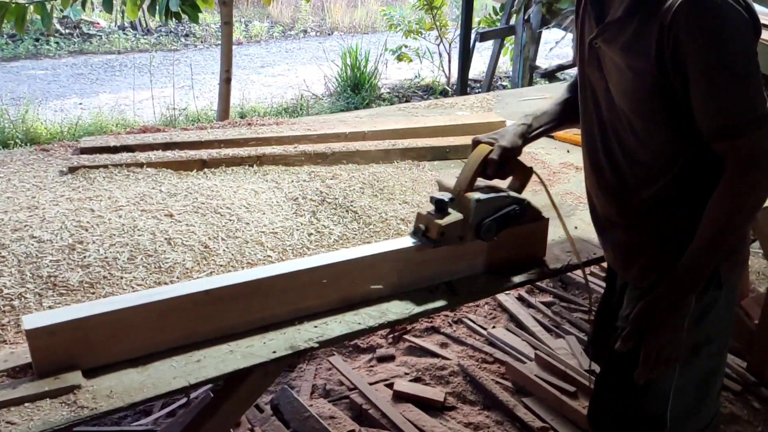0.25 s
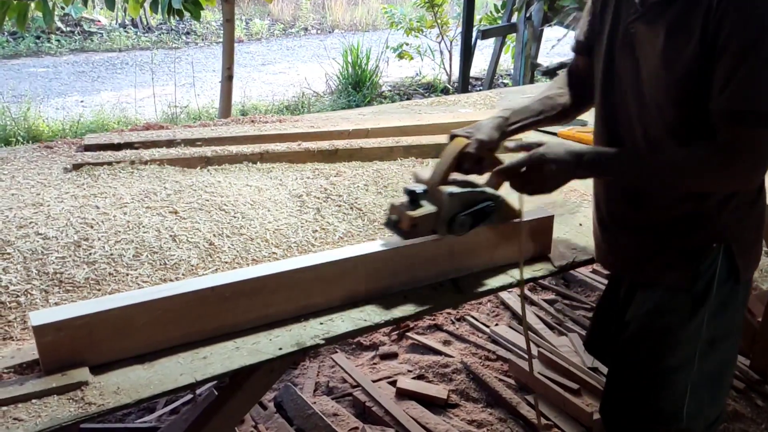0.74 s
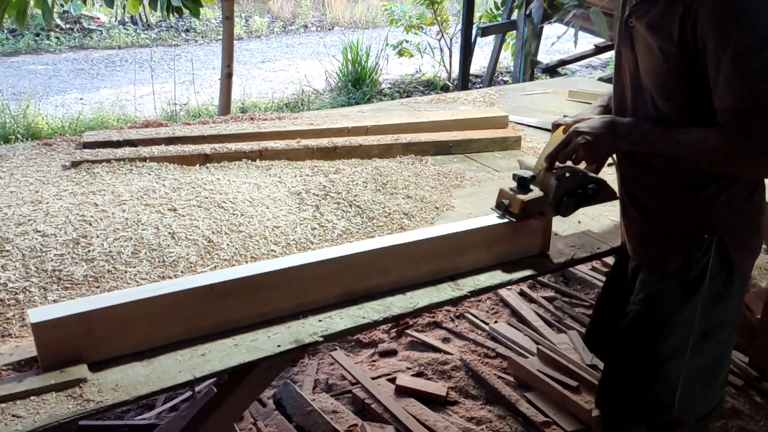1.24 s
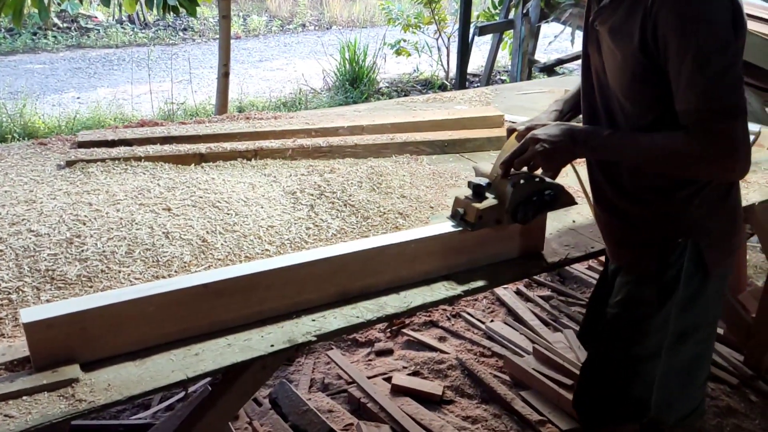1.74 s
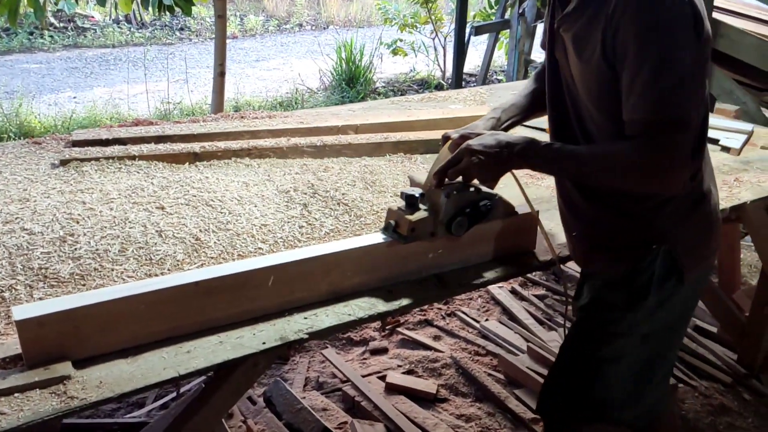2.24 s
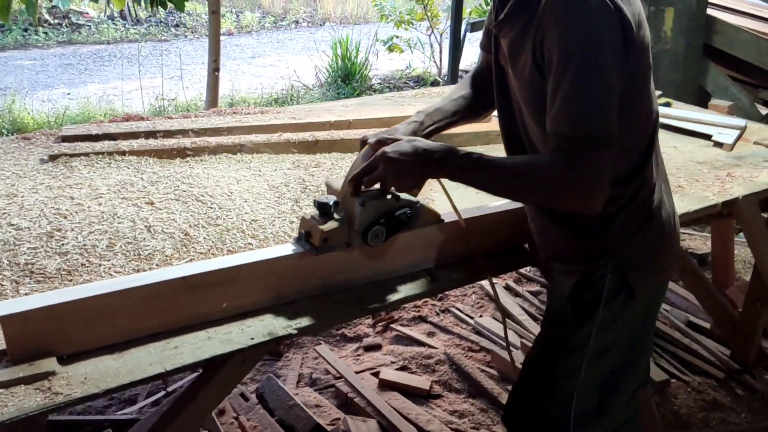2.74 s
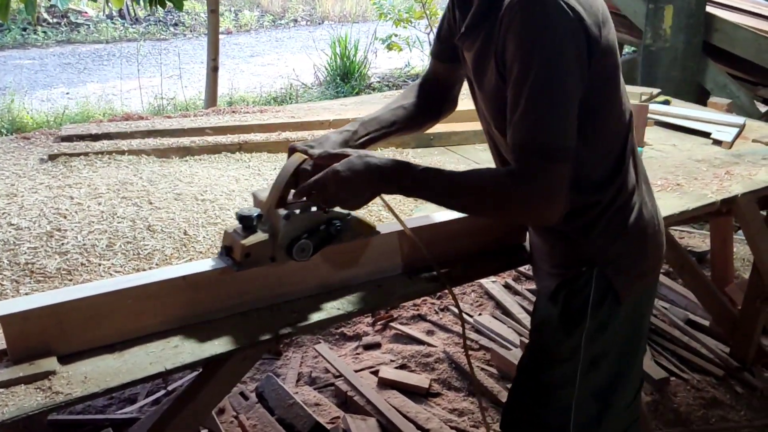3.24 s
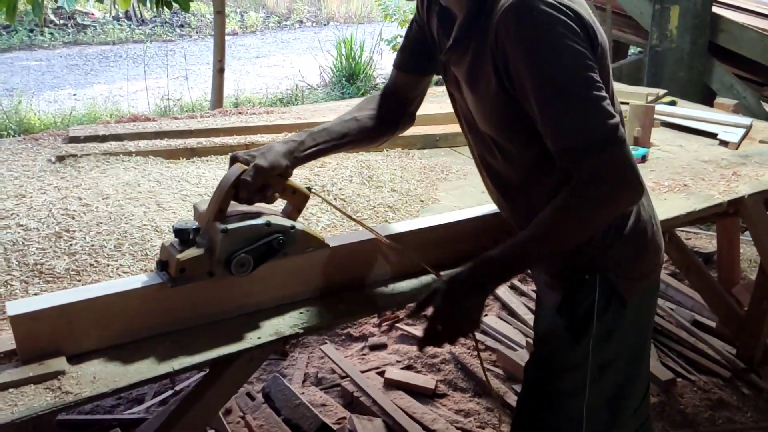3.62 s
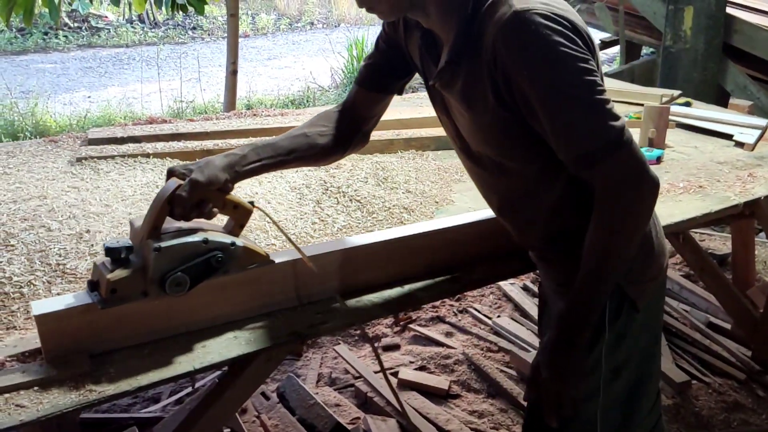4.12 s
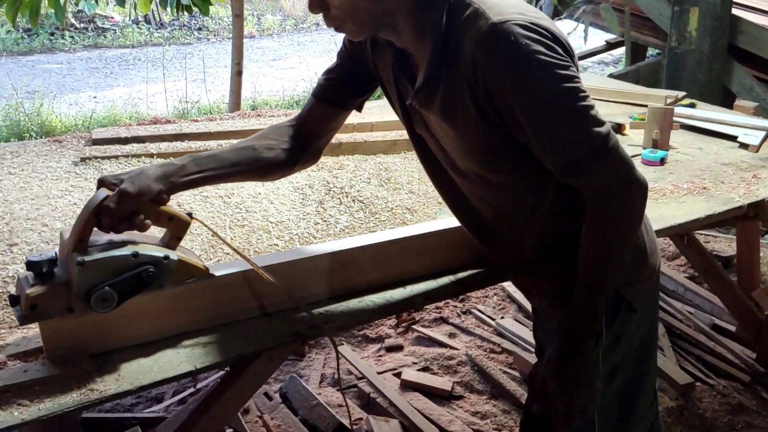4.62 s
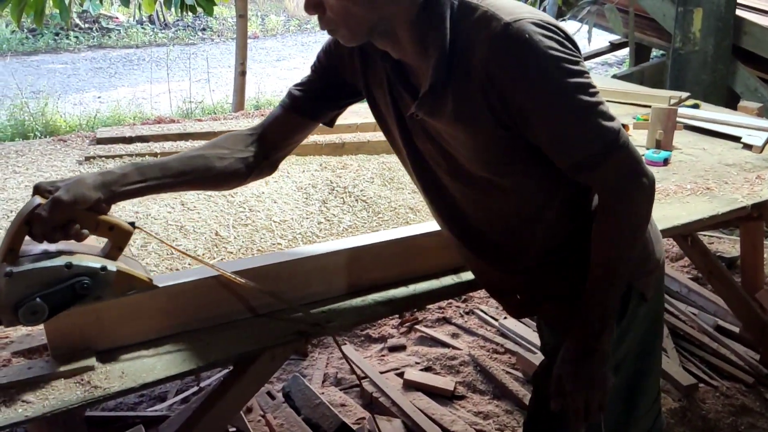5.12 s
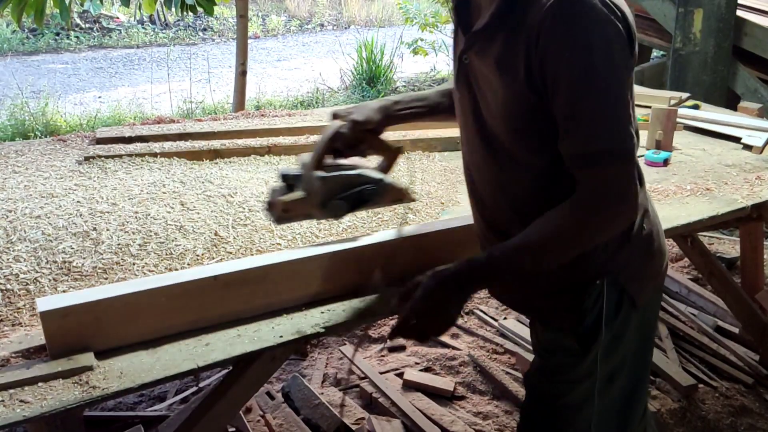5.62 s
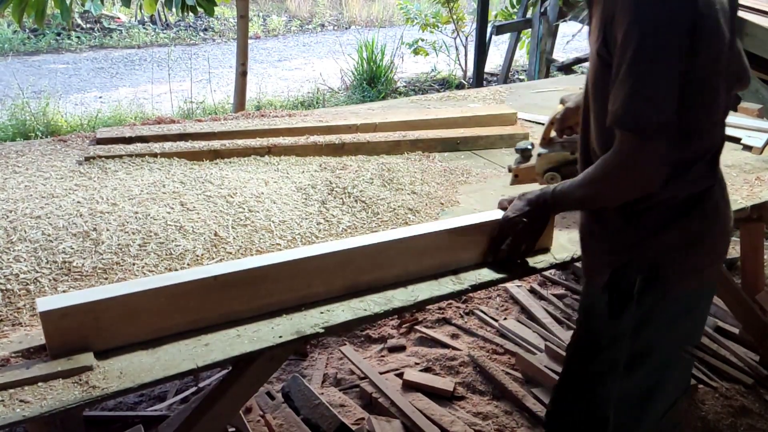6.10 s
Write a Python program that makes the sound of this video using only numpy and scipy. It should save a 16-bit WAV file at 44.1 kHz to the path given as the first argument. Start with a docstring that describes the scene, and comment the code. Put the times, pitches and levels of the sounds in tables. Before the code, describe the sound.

Close stereo capture of an electric planer on timber. The end of a short pass buzzes loudly, then the freed cutter hums and whines higher. A long second pass follows, rough, bright and strained, with shifting woody resonances and a spray of chips. It then clears the beam, surges in speed, and winds down with airy hum, fan hiss and faint low rumble in an open shed.

```python
"""The buzz of planer blades in a beam comes first, in an open shed: a short pass, then a long one, then lift and coast.
Two blades strike the wood per turn of the cutter: harmonics of its speed, which sags with the load.
Running free, the drum hums and the motor whines, as wavering partials geared to the same speed.
The fan hisses throughout as coloured noise, muffled while the sole is down; chips hiss in the cut."""
import sys
import numpy as np
from scipy import signal
from scipy.fft import rfft, irfft
from scipy.io import wavfile
from scipy.ndimage import map_coordinates

SR = 44100
rng = np.random.default_rng(int(sys.argv[2]) if len(sys.argv) > 2 else 0)


def bounce(signal):
    """Save signal as a 16-bit WAV file at the path given by the first command-line argument."""
    frames = np.transpose(np.atleast_2d(signal))
    limited = np.clip(frames, -1, 1)
    pcm = np.round(limited * 32767).astype(np.int16)
    wavfile.write(sys.argv[1], SR, pcm)


N = 280476
TIME = np.arange(N) / SR
BINS = np.fft.rfftfreq(N, 1 / SR)  # Hz
FRAMES = np.arange(0, N + 63, 64) / SR  # s, control times of the blade harmonics


def gain_of(db):
    """Amplitude factor of a level in dB."""
    return 10 ** (np.asarray(db) / 20)


def evened(x):
    """Scales to rms 1."""
    return x / np.sqrt(np.mean(abs(x) ** 2) + 1e-20)


def read(points, hz):
    """A spectrum, joined on a log-frequency axis."""
    point_hz, value = np.transpose(points)
    return np.interp(np.log(hz + 1), np.log(point_hz + 1), value)


def curves(rows):
    """Each column of a table at every sample."""
    time_s, *columns = np.transpose(rows)
    return [np.interp(TIME, time_s, column) for column in columns]


def wander(rate_hz):
    """Slow chance of rms 1."""
    spectrum = rfft(rng.standard_normal(N // 32))
    slow = irfft(spectrum / (1 + (BINS[:len(spectrum)] / rate_hz) ** 4))
    return evened(np.interp(TIME, np.linspace(0, TIME[-1], len(slow)), slow))


def flutter(count, rate_hz):
    """Complex chance of rms 1 at the frame times, one row per harmonic."""
    shape = (count, len(FRAMES))
    z = rng.standard_normal(shape) + 1j * rng.standard_normal(shape)
    frame_bins_hz = np.fft.fftfreq(len(FRAMES), FRAMES[1])
    return evened(np.fft.ifft(z / (1 + (frame_bins_hz / rate_hz) ** 2)))


def resonances(rows, hz):
    """Gain in dB of bell-shaped peaks and notches."""
    return sum(db * np.exp(-((hz - centre_hz) / width_hz) ** 2) for centre_hz, width_hz, db in rows)


def tone(turns, multiple, waver_rad, rate_hz):
    """One wavering partial of rms 1, reaching the microphones with its own phase."""
    phase = 2 * np.pi * (multiple * turns + rng.random()) + waver_rad * wander(rate_hz)
    apart_rad = np.minimum(multiple / 20, 2) * rng.uniform(-1, 1)
    return np.sqrt(2) * np.cos([phase + apart_rad / 2, phase - apart_rad / 2])


# likeness of the two microphones: freq_hz, likeness_0_to_1
MIC_LIKENESS = [(60, .85), (400, .9), (1000, .68), (4000, .55), (7000, .4), (9000, .3), (14000, .15)]


def air_noise(colour):
    """Coloured noise of rms 1, partly alike at the two microphones."""
    a, b = rfft(rng.standard_normal((2, N)))
    same = read(MIC_LIKENESS, BINS)
    pair = np.array([a, same * a + np.sqrt(1 - same ** 2) * b])
    return evened(irfft(pair * gain_of(read(colour, BINS)), N))


# drum under power, sagging with the load: time_s, speed_turns_per_s
DRUM_SPEED = [(0.0, 229.8), (0.24, 232.8), (0.47, 231.7), (0.556, 221.6), (0.645, 218.2), (0.87, 248.0),
              (1.11, 266.2), (1.31, 277.0), (1.43, 270.7), (1.83, 240.4), (2.12, 230.3), (2.42, 209.2),
              (2.56, 217.3), (2.7, 221.0), (2.9, 211.8), (3.1, 205.5), (3.36, 206.9), (3.82, 215.3),
              (4.15, 210.8), (4.53, 210.6), (4.8, 213.8), (4.93, 218.2), (5.33, 259.1)]
OFF_S, OFF_HZ, COAST_S = 5.36, 258.6, 2.68  # switch-off time, speed then, time constant
USUAL_HZ = 230


def drum_speed():
    """Turns per second: driven, then coasting down exponentially."""
    coasting_hz = OFF_HZ * np.exp((OFF_S - TIME) / COAST_S)
    return np.where(TIME < OFF_S, curves(DRUM_SPEED)[0], coasting_hz)


def doublings():
    """The speed in octaves above the usual one."""
    return np.log2(drum_speed() / USUAL_HZ)


def held(start_s, end_s, attack_s, release_s):
    """Attack, hold and release from 0 to 1, halfway at start and end."""
    rise = (TIME - start_s) / attack_s
    fall = (end_s - TIME) / release_s
    return np.clip(.5 + np.minimum(rise, fall), 0, 1)


# passes along the beam: sole_over_s, blades_bite_s, blades_run_out_s, tool_lifts_s, sole_clear_s, lift_length_s
PASSES = [(-0.4, -0.2, 0.673, 0.74, 0.836, 0.04), (1.133, 1.304, 5.15, 5.228, 5.46, 0.012)]
NEAR_S, BITE_S, RUN_OUT_S = 0.094, 0.025, 0.031  # length of each change


def bite():
    """0 with the blades running free, 1 with them in the wood."""
    return sum(held(start, end, BITE_S, RUN_OUT_S) for _, start, end, *_ in PASSES)


def stance(ease_s=0):
    """Shares that sum to 1: sole on the wood, hovering just above it, in free air."""
    down = sum(held(start, lift, BITE_S, lift_s + ease_s) for _, start, _, lift, _, lift_s in PASSES)
    over_beam = sum(held(over, clear, NEAR_S, NEAR_S) for over, *_, clear, _ in PASSES)
    near = np.maximum(down, over_beam)
    return down, near - down, 1 - near


# planer before the microphones: time_s, left_delay_ms
LEFT_DELAY = [(0, -0.079), (3, -0.085), (3.8, 0.13), (4.55, 0.24), (5.45, 0.23), (5.85, -0.046),
              (6.3, -0.093)]


def travel(pair):
    """As the planer moves along the beam, its sound reaches one microphone before the other."""
    lag_samples = curves(LEFT_DELAY)[0] * SR / 1000
    left = map_coordinates(pair[0], [np.arange(N) - lag_samples], order=5, mode="mirror")
    return np.array([left, pair[1]])


def reach(steepness=27.0):
    """0 with the planer at the near end of the beam, rising to 1 as its nose overhangs the far end."""
    lag_ms = curves(LEFT_DELAY)[0]
    return ((lag_ms - lag_ms.min()) / np.ptp(lag_ms)) ** steepness


# way along the beam: time_s, place_0_near_to_1_far
BEAM_PLACE = [(0, .07), (.65, .33), (1, 0), (1.3, 0), (2, .16), (3, .44), (4, .74), (5.2, 1)]
# pitches the beam and bench favour or swallow, before depth: centre_hz, width_hz, gain_db, place_0_to_1,
# spread_beam_lengths
BEAM_RESONANCES = [(1496, 130, -11, 1, 0.041), (1840, 70, -6.5, 0.3, 2), (2175, 51, -17, 0.07, 0.33),
                   (2390, 153, -10.5, 0.64, 0.58), (2510, 106, 8.5, 0.1, 2), (2770, 110, -21, 0.89, 0.11),
                   (2726, 120, -21, 0.34, 0.32), (3000, 95, 1.5, 0.74, 0.16), (3100, 42, 6.5, 0.2, 0.092),
                   (3184, 76, -12, 0.7, 2.2), (3480, 92, 7, 0.05, 0.36), (3750, 44, -16.5, 0.9, 2.2),
                   (4050, 75, 8.5, 0.1, 1.4), (4420, 52, 0, 0.9, 0.39), (4344, 53, 15, 0.72, 0.12),
                   (4410, 70, 19, 0.94, 0.12), (4660, 340, 7.5, 0.52, 0.34), (5150, 63, 10.5, 0.6, 2.2),
                   (4860, 76, -19, 0.55, 0.18), (5720, 100, 14, 0.49, 0.073), (5920, 41, -10, 0.2, 0.34),
                   (6020, 190, 7, 0.0, 0.083)]


def timber(hz, depth=0.91):
    """Gain in dB at the frame times: each beam resonance answers most where the blades pass its place."""
    place = np.interp(FRAMES, *np.transpose(BEAM_PLACE))
    gain_db = 0
    for *bell, at, spread in BEAM_RESONANCES:
        gain_db = gain_db + resonances([bell], hz) * np.exp(-((place - at) / spread) ** 2)
    return depth * gain_db


# where the rasp and the sizzle begin: edge_hz
CUT_EDGES_HZ = [3000, 6530]
# colour of the buzz within each range: freq_hz, relative_db
BUZZ_COLOUR = [(1400, -3), (2400, 8.5), (4500, 6.5), (5800, 6), (7200, 7), (8700, 10.5), (11000, 6),
               (13000, -17), (15500, -30)]
# one blade cuts deeper as the stroke goes on, lifting odd harmonics; before low_odd_db: time_s, odd_db
BLADE_UNEVENNESS = [(0.1, -23), (0.35, -10), (0.6, -14), (1.4, -17), (2.0, -17), (2.55, -15), (2.8, -10),
                    (3.1, -7), (3.45, -5), (3.7, 3), (4.0, -4), (4.3, 2), (4.55, 3), (4.8, 9), (5.05, -7)]
# knock of the beam while the blades cut, before trim: time_s, level_db
BEAM_KNOCK = [(0.02, -36.5), (0.54, -41), (0.65, -32), (1.32, -31), (1.58, -32), (1.85, -25), (2.0, -34),
              (2.19, -33.5), (2.43, -22.5), (2.52, -30), (2.71, -37), (2.86, -28.5), (3.05, -36),
              (3.5, -35.5), (3.65, -25), (4.0, -24), (4.36, -19), (4.6, -24.5), (4.92, -19.5), (5.06, -23),
              (5.13, -29)]
# rasp of the sole plate, before trim: time_s, level_db
SOLE_RASP = [(0.02, -19), (0.1, -22), (0.17, -29), (0.35, -26.5), (0.53, -21), (0.65, -25), (1.32, -27.5),
             (1.44, -23.5), (1.55, -27.5), (1.68, -17), (1.82, -26.5), (1.88, -24), (2.02, -27),
             (2.24, -21), (2.47, -24), (2.64, -20), (2.75, -26.5), (2.93, -22.5), (3.06, -23.5),
             (3.15, -25.5), (3.6, -17.5), (4.2, -21), (4.6, -14), (5.05, -21), (5.13, -23.5)]
# sizzle of the edges, before trim: time_s, level_db
EDGE_SIZZLE = [(0.02, -16), (0.11, -19.5), (0.4, -17), (0.52, -18), (0.58, -22), (0.65, -25), (1.32, -17.5),
               (1.7, -19), (1.98, -20), (2.17, -21), (2.54, -17), (2.68, -16.5), (2.77, -22.5),
               (2.95, -18.5), (3.05, -25), (3.15, -22), (3.65, -17.5), (3.8, -25), (4.2, -18.5),
               (4.47, -21), (4.85, -18.5), (5.13, -17)]


def strike_heights(trims_db, low_odd_db=-4.0, low_odd_hz=3300):
    """Harmonic heights over time: the beam, the sole plate and the edges each ring in their own range."""
    controls = [drum_speed()]
    for table in (BLADE_UNEVENNESS, BEAM_KNOCK, SOLE_RASP, EDGE_SIZZLE):
        controls += curves(table)
    speed_hz, odd_db, *levels_db = (np.interp(FRAMES, TIME, control) for control in controls)
    multiples = np.arange(7, 70)
    hz = multiples[:, None] * speed_hz
    odd = multiples[:, None] % 2 / (1 + (hz / 7000) ** 4)
    low_odd = low_odd_db / (1 + (hz / low_odd_hz) ** 12)
    db = read(BUZZ_COLOUR, hz) + timber(hz) + odd * (odd_db + low_odd)
    above_knock, above_rasp = (1 / (1 + (edge_hz / hz) ** 24) for edge_hz in CUT_EDGES_HZ)
    shares = [1 - above_knock, above_knock - above_rasp, above_rasp]
    power = 0
    for share, level_db, trim_db in zip(shares, levels_db, trims_db):
        part = share * gain_of(db) ** 2
        power = power + part / part.sum(0) * gain_of(level_db + trim_db) ** 2
    return multiples, np.sqrt(power)


RING_S, APART_HZ = .0013, 4500  # burst decay; where the two sides' own parts match the shared one


def ring_phases(hz):
    """The tool's dense modes draw each strike out into a short dying burst; its treble differs by side."""
    bursts = rng.standard_normal((3, 512)) * np.exp(-TIME[:512] / RING_S)
    shared, *own = rfft(bursts, N)
    rings = shared + np.array(own) * (BINS / APART_HZ) ** 2
    return [np.exp(1j * np.interp(hz, BINS, np.unwrap(np.angle(ring)))) for ring in rings]


def blade_contact(graze_db=-12.5):
    """Full in the cut; the blades still graze the wood until the tool lifts."""
    cut = bite()
    return cut + gain_of(graze_db) * (1 - cut) * stance()[0]


FUZZ, DRIFT, FRAY_HZ = .27, .36, 10500  # low-frequency amounts; both double at FRAY_HZ


def cutting(turns, knock_db=0., rasp_db=0., sizzle_db=-0.5, fuzz_hz=30, sway_turns=0.00036, grain_db=0.91):
    """Blade strikes ring briefly in the tool; grain frays them and reflections drift, most in the treble."""
    multiples, heights = strike_heights((knock_db, rasp_db, sizzle_db))
    count = len(multiples)
    hz = multiples[:, None] * np.interp(FRAMES, TIME, drum_speed())
    fuzz, drift = (amount * (1 + (hz / FRAY_HZ) ** 2) for amount in (FUZZ, DRIFT))
    frayed = 1 + fuzz * flutter(count, fuzz_hz)
    heights = heights / np.sqrt(1 + fuzz ** 2 + drift ** 2)
    sides = [heights * ring * (frayed + drift * flutter(count, rate_hz=15.6)) for ring in ring_phases(hz)]
    rotor = np.exp(2j * np.pi * (turns + sway_turns * wander(16)))
    partial = rotor ** (multiples[0] - 1)
    out = np.zeros((2, N))
    for left, right in zip(*sides):
        partial = partial * rotor  # next harmonic
        out += [(np.interp(TIME, FRAMES, side) * partial).real for side in (left, right)]
    return np.sqrt(2) * out * blade_contact() * gain_of(grain_db * wander(45))


# brief dips of the treble: time_s, dip_db
TREBLE_DIPS = [(1.11, -4), (5.5, -1.5), (5.78, -3.5)]
DIP_S = 0.041


def treble_dips():
    """The treble dips briefly, in dB."""
    return sum(db * np.exp(-((TIME - at_s) / DIP_S) ** 2) for at_s, db in TREBLE_DIPS)


# hiss of flying chips, rising and falling through each cut; before chips_db and dips: time_s, level_db
CHIP_SPRAY = [(0.02, -19.5), (0.12, -23.5), (0.28, -14.5), (0.5, -16), (0.65, -24), (1.32, -19),
              (1.51, -18.5), (1.8, -21), (1.92, -15), (2.1, -19.5), (2.5, -16), (2.77, -23), (2.9, -19),
              (3.49, -18.5), (4.3, -19.5), (4.95, -21.5), (5.13, -16.5)]


def hiss_level(down_db=-28.0, far_db=4.0, lifted_db=-16.0, per_doubling_db=-1.0, chips_db=0.):
    """In dB: the fan, muffled with the sole down but less so at the far end, plus chips thrown by the cut."""
    down = stance()[0]
    fan_db = down * (down_db + far_db * reach()) + (1 - down) * lifted_db + per_doubling_db * doublings()
    chips = bite() * gain_of(chips_db + curves(CHIP_SPRAY)[0])
    return 20 * np.log10(np.hypot(gain_of(fan_db), chips)) + treble_dips()


def roar_level(down_db=-44.5, hovering_db=-34.5, free_db=-37.0, per_doubling_db=1.0, far_db=3.0):
    """In dB before trims: the air round the drum roars once the slot in the sole is open."""
    down, hovering, free = stance()
    stance_db = down * down_db + hovering * hovering_db + free * free_db
    return stance_db + per_doubling_db * doublings() + far_db * reach()


# noise of tearing fibres, before chatter and flutter: time_s, level_db
FIBRE_TEAR = [(0.3, -48), (0.54, -34), (0.64, -41), (2.05, -45), (2.15, -39), (3.2, -49), (3.77, -42),
              (4.13, -46), (4.7, -43), (5.11, -35)]
# colour of tearing fibres: freq_hz, relative_db
FIBRE_COLOUR = [(700, 1), (1400, -21), (2300, 13), (3400, 4), (4500, 20), (6000, 3), (8000, -13)]
# colour of the roar round the drum: freq_hz, relative_db
ROAR_COLOUR = [(30, -3.5), (90, -10.5), (160, -3), (300, -13), (500, 5.5), (800, -1), (1100, 7), (1900, 2),
               (2600, -2.5), (4000, -7.5), (8000, -42)]
# colour of the rush at the open slot: freq_hz, relative_db
RUSH_COLOUR = [(1500, -9), (2300, 9), (3000, -5), (4000, -5), (5500, 9), (7000, -3), (10000, -50)]
# colour of the fan hiss: freq_hz, relative_db
FAN_COLOUR = [(2000, -21), (4000, -14.5), (5500, -17.5), (6800, -8.5), (7700, -3), (8600, 1.5),
              (9700, -4.5), (11000, -4), (13000, -11.5), (15500, -31)]
# colour of the chips, which hiss higher than the fan: freq_hz, relative_db
CHIP_COLOUR = [(2000, -27), (5000, -22), (6700, -12), (7700, -2.5), (8600, 3.5), (9700, -2), (11000, 1),
               (13000, -5.5), (15500, -25)]


def rushing_air(turns, roar_db=3.5, rush_db=3.0, hiss_db=0., sole_db=-5.0, flutter_db=1.0, chatter_db=7.0,
                whirl_db=3.5):
    """Turbulence round the drum, at the open slot and in the fan; chips and fibres puff at each strike."""
    roar_level_db, cut = roar_level(), bite()
    puffs = evened(.7 + np.exp(-(2 * turns % 1) / .35))  # two per turn
    gate = 1 + cut * (puffs - 1)
    roar = gain_of(roar_db + roar_level_db) * air_noise(ROAR_COLOUR)
    rush_level_db = rush_db + roar_level_db + sole_db * stance()[0] + whirl_db * wander(28)
    rush = (1 - cut) * gain_of(rush_level_db) * air_noise(RUSH_COLOUR)
    tear_level_db = curves(FIBRE_TEAR)[0] + chatter_db * wander(45)
    tear = cut * gain_of(tear_level_db) * air_noise(FIBRE_COLOUR)
    hiss_mix = np.sqrt(1 - cut) * air_noise(FAN_COLOUR) + np.sqrt(cut) * air_noise(CHIP_COLOUR)
    hiss = gain_of(hiss_db + hiss_level()) * hiss_mix
    return gain_of(flutter_db * wander(24)) * (roar + rush + gate * (tear + hiss))


# air tones of the drum, before hum_db: speed_multiple, on_wood_db, hovering_db, free_air_db,
# on_wood_db_per_speed_doubling, on_wood_far_end_db
DRUM_TONES = [(1, -37.5, -26, -48, 6.7, -1.5), (2, -32.5, -31.5, -32, 8.9, -1), (4, -42, -29.5, -34, 15, 7),
              (6, -40, -37.5, -34, 1.3, 7)]
# weaker drum tones, against the mean of the main ones, before trims: speed_multiple, relative_db
WEAK_TONES = [(3, -10), (5, -7), (7, -12.5), (8, -10.5), (10, -4), (12, -3.5)]
# hollow of the chip chute lifts drum tones, while the sole is up: centre_hz, width_hz, gain_db
CHUTE_RESONANCES = [(542, 104, 6.5), (743, 12, 11.5), (833, 28, 9), (1027, 50, 8), (1150, 24, 10.5),
                    (1424, 25, 8), (1630, 40, 13), (1986, 120, 10)]
# the hum fades briefly: time_s, width_s
BRIEF_FADES = [(0.62, 0.12), (0.77, 0.054), (1.42, 0.0049), (2.01, 0.07), (2.77, 0.046), (3.18, 0.12),
               (4.96, 0.059)]
FADE_DB = -15  # at the fundamental


def drum_hum(turns, hum_db=-4.5, overtone_db=-3.5, leak_db=7.5, swell_db=2.5, swell_hz=9.0, waver_rad=0.17):
    """Blades chop the air at the sole slot like a siren: with the sole down, louder with speed."""
    down, hovering, free = stance(ease_s=0.081)
    faster, far, speed_hz = doublings(), reach(), drum_speed()
    fade_db = FADE_DB * sum(np.exp(-((TIME - at_s) / width_s) ** 2) for at_s, width_s in BRIEF_FADES)

    def chute_db(multiple):
        """Chute gain in dB, absent with the sole down."""
        return (1 - down) * resonances(CHUTE_RESONANCES, multiple * speed_hz)

    main, levels_db = 0, []
    for multiple, on_wood, above, in_air, slope, at_far_end in DRUM_TONES:
        k = round(multiple)
        on_wood_db = on_wood + slope * faster + at_far_end * far
        level_db = down * on_wood_db + hovering * above + free * in_air
        levels_db.append(level_db)
        colour_db = fade_db / k ** 2 + chute_db(k) + swell_db * wander(swell_hz)
        main = main + gain_of(level_db + colour_db) * tone(turns, k, waver_rad, rate_hz=22)
    weak = 0
    for k, db in WEAK_TONES:
        weak = weak + gain_of(db + chute_db(k)) * tone(turns, k, waver_rad=0.68, rate_hz=6.4)
    weak_level_db = overtone_db + leak_db * down * far + np.mean(levels_db, axis=0)
    return gain_of(hum_db) * main + gain_of(weak_level_db) * weak


BELT_RATIO = 1.81  # motor turns per drum turn


def motor_hum(turns, down_db=-54.0, hovering_db=-41.0, free_db=-53.0, far_db=7.0, per_doubling_db=48.5,
              swell_db=3.5):
    """The shaft turns a little slower than the blades pass and beats with their hum, more at high speed."""
    down, hovering, free = stance()
    stance_db = down * (down_db + far_db * reach()) + hovering * hovering_db + free * free_db
    level_db = stance_db + per_doubling_db * doublings() + swell_db * wander(5.9)
    return gain_of(level_db) * tone(turns, BELT_RATIO, waver_rad=0.082, rate_hz=10)


# motor, belt and bearings, against the hiss level, before housing colour and trims: speed_multiple, relative_db
WHINE_LINES = [(11.3, -15), (12.95, -16), (14, -15), (15.5, -19), (16.75, -16), (17.8, -16), (19.2, -12),
               (20.25, -17), (21.5, -12), (23, -15), (24, -13), (25.3, -10), (26.4, -17), (27.8, -13),
               (29, -13), (30.3, -12), (31.5, -8), (32.1, -14), (33.85, -13), (35.25, -13), (36.5, -12),
               (37.6, -12), (41, -17), (42.4, -16), (43.7, -14), (49.9, -21)]


def motor_whine(turns, whine_db=0., loaded_db=-7.0, hovering_db=1.5, coast_db_per_s=-5.5):
    """Fuzzy wavering lines, weaker in the cut, loudest near the fan housing resonance; they die in the coast."""
    speed_hz = drum_speed()
    lines = 0
    for k, db in WHINE_LINES:
        housing_db = .45 * read(FAN_COLOUR, k * speed_hz)
        line_db = db + housing_db + 3 * wander(9)
        lines = lines + gain_of(line_db) * tone(turns, k, waver_rad=1.05, rate_hz=32)
    coasting_db = coast_db_per_s * np.maximum(TIME - OFF_S, 0)
    stance_db = loaded_db * bite() + hovering_db * stance()[1]
    return lines * gain_of(whine_db + hiss_level() + stance_db + coasting_db)


# low rumble comes and goes: start_s, end_s, level_db
RUMBLE_SPANS = [(0.73, 0.947, -44), (5.843, 6.5, -45.5)]
# colour of the rumble: freq_hz, relative_db
RUMBLE_COLOUR = [(25, -3), (50, -3), (90, 12), (160, -14), (400, -7), (2000, -70)]


def rumble(attack_s=0.12, release_s=0.3):
    """Low rumble, as dark noise, while the planer is carried back."""
    level = sum(gain_of(db) * held(start, end, attack_s, release_s) for start, end, db in RUMBLE_SPANS)
    return air_noise(RUMBLE_COLOUR) * level


def scene():
    """Cutting, hums, whine and air follow the cutter drum and travel with the planer; the rumble stays put."""
    turns = np.cumsum(drum_speed()) / SR
    planer = cutting(turns) + rushing_air(turns) + drum_hum(turns) + motor_hum(turns) + motor_whine(turns)
    return travel(planer) + rumble()


# colour difference of the two microphones: freq_hz, left_minus_right_db
MIC_TILT = [(100, -1.5), (500, -3), (1200, -3.5), (2500, -1), (5000, 1.5), (7000, 1), (8400, -7),
            (9600, -1.5), (11000, 12.5), (14000, 3.5)]
EDGE_HZ, CEILING = 15400, 1.0  # band limit; full-scale amplitude


def record(dry):
    """The two microphones differ in colour; peaks are rounded off; then the band limit."""
    sides = gain_of(read(MIC_TILT, BINS) * np.array([[.5], [-.5]]))
    sides = sides / np.sqrt(np.mean(sides ** 2, axis=0))
    heard = irfft(rfft(dry) * sides, N)
    heard = heard / (1 + (heard / CEILING) ** 8) ** (1 / 8)
    lowpass = signal.firwin(511, EDGE_HZ, window=("kaiser", 9), fs=SR)
    return signal.oaconvolve(heard, lowpass[None], "same")


dry = scene()
out = record(dry)
bounce(out)
```